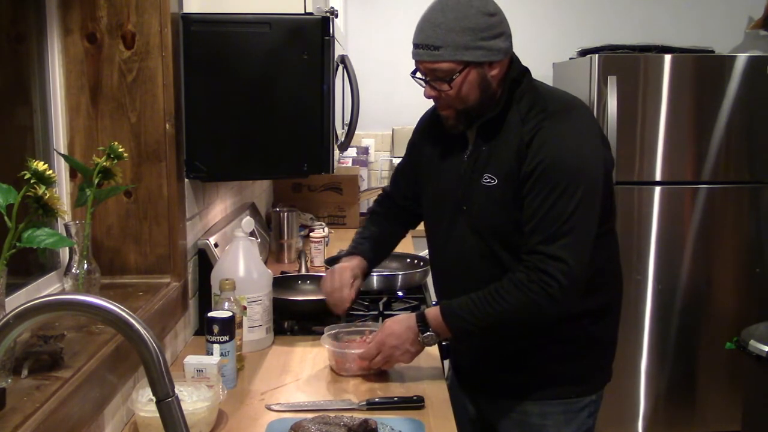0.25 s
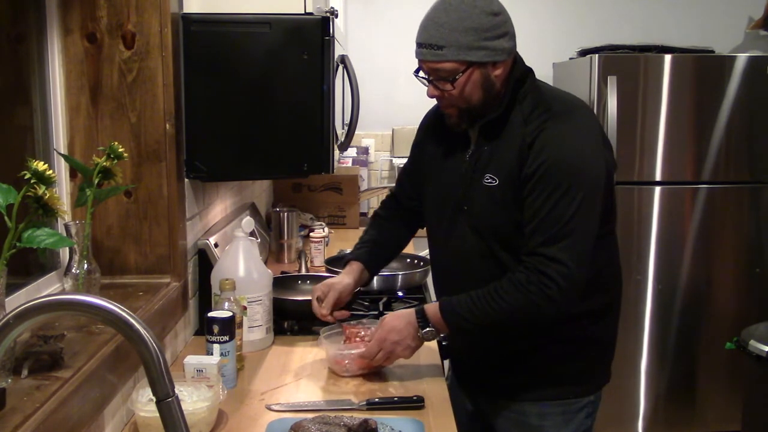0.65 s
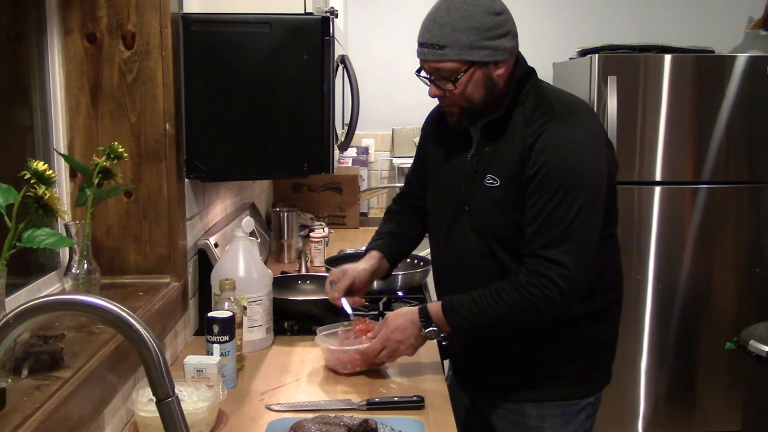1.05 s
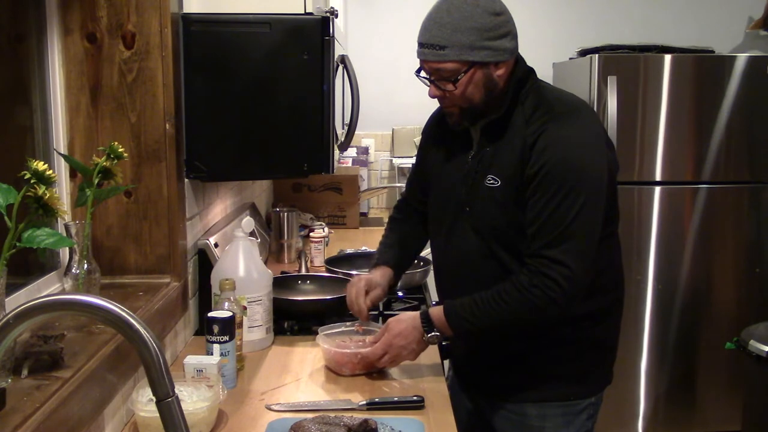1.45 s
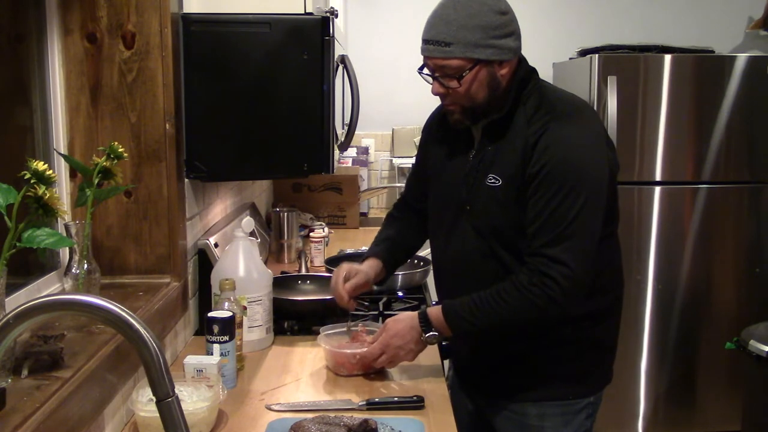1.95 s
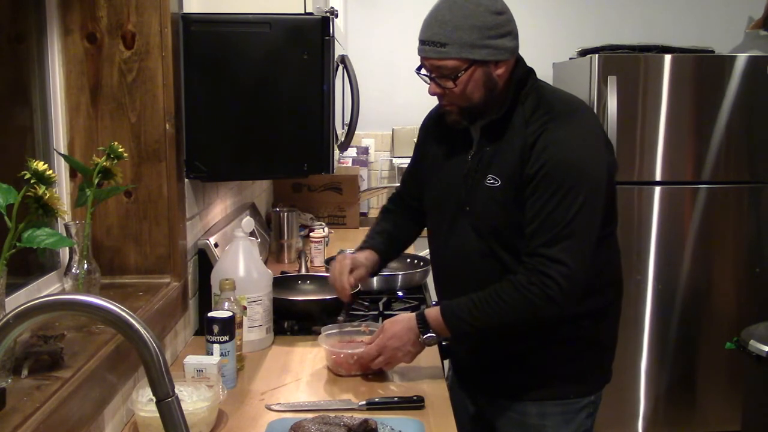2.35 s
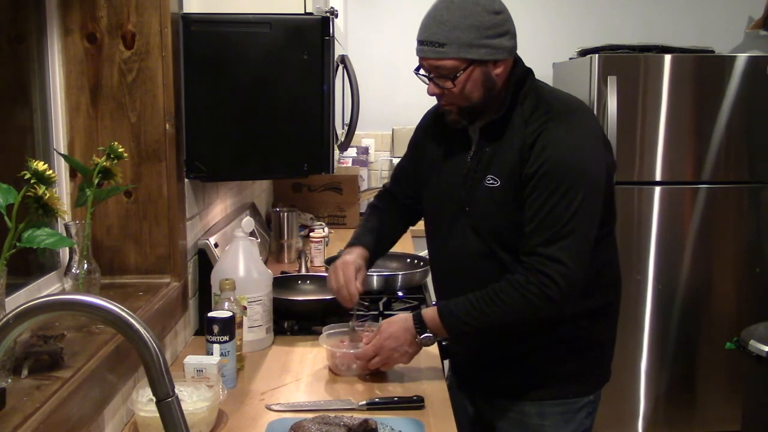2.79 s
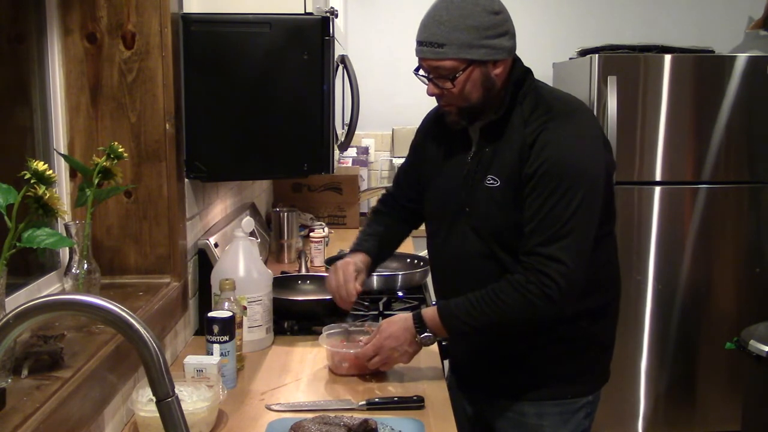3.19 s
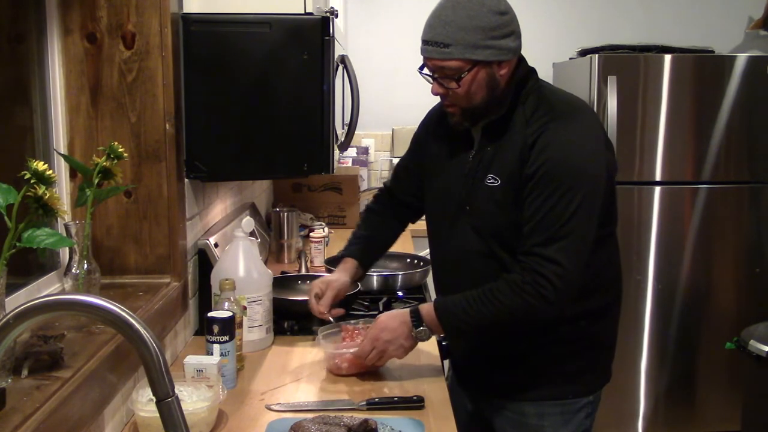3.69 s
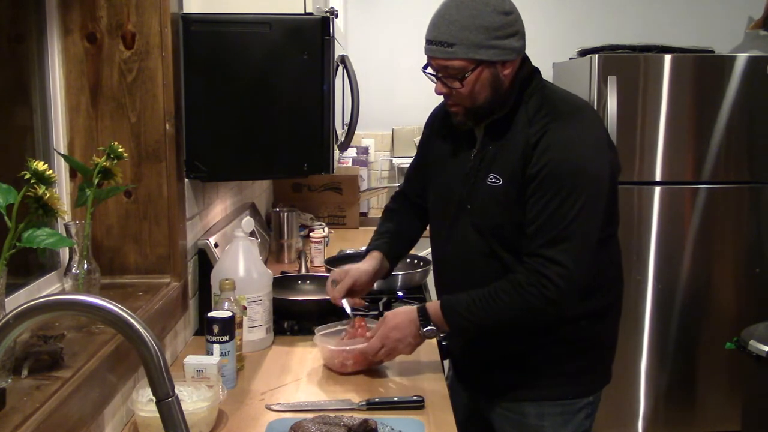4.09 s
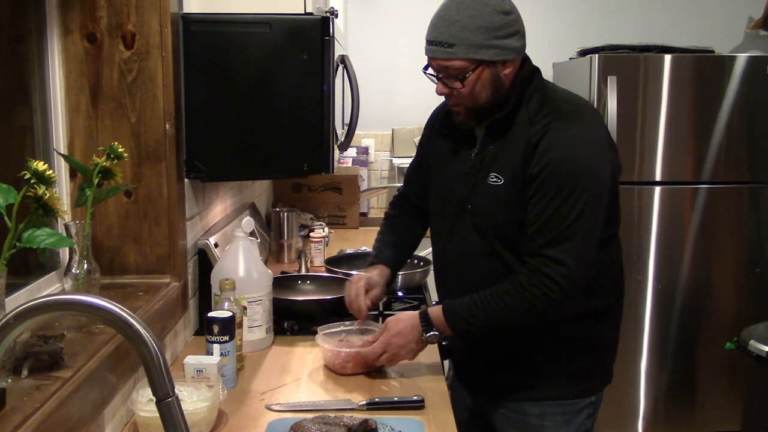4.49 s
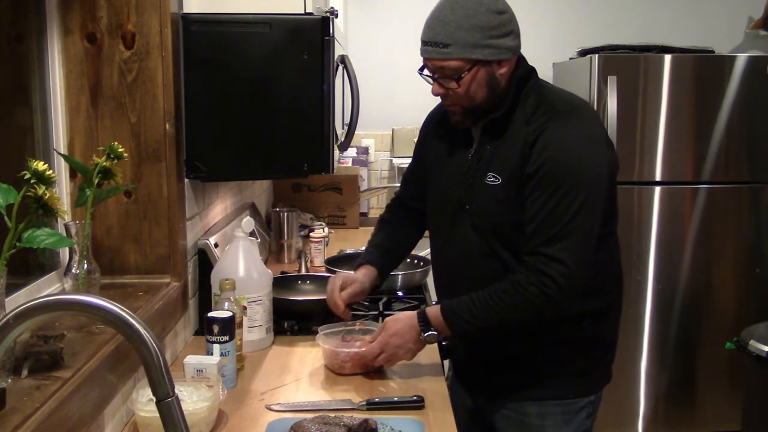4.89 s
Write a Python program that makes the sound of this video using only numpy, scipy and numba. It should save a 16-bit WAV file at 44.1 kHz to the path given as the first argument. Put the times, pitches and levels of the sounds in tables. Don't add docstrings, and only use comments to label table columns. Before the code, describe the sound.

Someone stirs chopped vegetables in a plastic tub: uneven hollow clacks, brief gritty scrapes and tiny wet squeaks, with a refrigerator humming behind.

```python
import sys
import numpy as np
from scipy import signal
from scipy.fft import rfft, irfft, next_fast_len
from scipy.io import wavfile
from scipy.ndimage import uniform_filter1d
from numba import njit

SR = 44100
rng = np.random.default_rng(int(sys.argv[2]) if len(sys.argv) > 2 else 0)


def makeup_ratio(level_db):
    decades = np.asarray(level_db, float) / 20
    return 10 ** decades


def persist_wave(psi):
    counts = np.round(np.clip(psi, -1, 1) * 32767).astype(np.int16)
    wavfile.write(sys.argv[1], SR, np.atleast_2d(counts).T)


N = 226892
T = np.arange(N) / SR

# f/Hz (knock and clack: ratio to their pitch), contact level to spectrum/dB
CONTACT_PARTS = [
    (790, 34.5),
    (270, 43),
    (0.994, 35.5),
    (1.003, 30.5),
    (7500, 29.5),
]
# f/Hz, level under the nearest part/dB
PULSE_ENDS = [(110, -19.5), (16500, -21.5)]
# f/Hz, width/Hz, level above the pulse/dB (below 0: a dip)
TUB_MODES = [(243.4, 37, 4.5), (269, 28, 1.5), (406, 107, 5.5), (516, 45, -13), (570, 72, 3), (684, 116, 8),
             (766, 65, 7.5), (1003, 107, 7.5), (1115, 210, 1), (1295, 70, 5), (1397, 230, 3),
             (1740, 130, 4),
             (2110, 190, 5.2), (2600, 150, 3.9), (3176, 166, 6.4), (3700, 87, 6.9), (4160, 210, 0.97),
               (5100, 60, 2.5), (5780, 340, 6), (7000, 510, 0.65), (8700, 1200, 4.9)]


def knocks(spot_db=1.68, detune=0.049, chatter=1.0, chatter_s=0.0029, even=0.88, damping=1.3):
    size = 4096
    out, t = np.zeros(N + size), T[:size]
    f = np.maximum(np.fft.rfftfreq(size, 1 / SR), 1)
    part_hz, part_db = np.transpose(CONTACT_PARTS)
    mode_hz, width, mode_db = np.transpose(TUB_MODES)[:, :, None]
    (low_hz, low_db), (high_hz, high_db) = PULSE_ENDS
    for s, pitch, blow_db in contacts():
        push = sorted(zip(part_hz * pitch, part_db + blow_db))
        bottom_db, top_db = push[0][1], push[-1][1]
        push = [(1, bottom_db - 80), (low_hz, bottom_db + low_db), *push, (high_hz, top_db + high_db)]
        spot, shift = rng.standard_normal((2, len(mode_hz), 1))
        off_peak = 2 * (f - mode_hz * (1 + detune * shift)) / (damping * width)
        ringing = (mode_db + spot_db * spot) / (1 + off_peak ** 2)
        burst = rng.standard_normal(size) * np.exp(-t / chatter_s)
        rattle = 1 + chatter * rfft(burst) * f / (f + 6000)
        evening = even * 20 * np.log10(np.abs(rattle) + 0.12)
        pulse = causal(on_log(push, f) + ringing.sum(axis=0) - evening)
        fade = np.clip(2 - 2.5 * t / t[-1], 0, 1)
        i = int(s * SR)
        out[i:i + size] += irfft(rfft(pulse) * rattle) * fade
    return out[:N]


# t/s, strength/dB, weight/dB, edge/dB, sharpness/dB
BLOWS = [(.263, -28, -4, -15.5, -1), (.315, -22, 5, -7, -1), (.526, -38, -10, -15.5, 8),
         (.603, -38, -13, -13, 5), (1.682, -30.5, 2, -2, -1.5), (1.721, -22, -6.5, -9, -.5),
         (2.514, -49.5, 9, 6.5, -1), (2.552, -27, 3.5, -10, 4.5), (3.034, -28, -15, -9, -1.5),
         (3.342, -18.5, 3, -6, -3.5), (3.5, -60.5, 14, 9.5, 8), (4.385, -47.5, 0.5, -8, 3),
         (4.773, -16, 2, -7.5, 0.3), (5.121, -57.5, 11, -5, 7)]
# t/s, strength/dB, weight/dB, edge/dB, sharpness/dB
CLACKS = [(.414, -30.5, 3.5, -6.5, -4), (.721, -39, -9, -13, -2), (1.793, -35.5, -4.5, -11, 7),
          (2.139, -51, -1.5, 2, -9), (2.192, -27.5, -11, -1.5, 1.5), (2.442, -36.5, 2, -11.5, 4),
          (2.643, -34, -8, -0.5, 2), (2.98, -44.5, -14, -6, 5), (3.271, -28.5, 2, -5.5, 1.5),
          (3.546, -38, -1, 0.5, -0.5), (3.784, -43, -9, -17, 2.5), (4.445, -18.5, -8, -0.5, -4.5),
          (4.825, -33, -3, 3, -3)]
# t/s, strength/dB, weight/dB, edge/dB, sharpness/dB
NUDGES = [(.874, -48, -0.5, -3, -7), (.971, -42, -12, -22, 6), (1.001, -45.5, -15, -11, -8),
          (1.152, -48, -3, -11, -1.5), (1.233, -45, -14, -18, -6), (1.262, -47, -4, -31, 6),
          (1.288, -39.5, -21, -20, -10), (1.317, -61, 12.5, -10, -3), (1.517, -51, -4, -9, -6),
          (2.039, -56.5, 3, -10, -.5), (2.382, -57.5, 8, -9, 7), (3.937, -28.5, -23, -38, 13),
          (4.669, -28.5, -14, -35, 2.5), (4.711, -42, -15.5, -18, -7), (5.084, -36, -8, -42, 9),
          (5.134, -33, -7, -20.5, 3)]


def contacts():
    kinds = [(BLOWS, 8.25, 4, 1280, 2630), (CLACKS, 10, 12, 1500, 3000), (NUDGES, 12.5, 11, 1180, 2840)]
    found = []
    for table, hollow, dull, knock_hz, clack_hz in kinds:
        pitch = (1, 1, knock_hz, clack_hz, 1)
        for s, db, weight, edge, sharp in table:
            body_db, clack_db = db + weight, db + edge
            levels = (body_db + hollow / 2, body_db - hollow / 2, db, clack_db, clack_db - dull + sharp)
            found.append((s, pitch, levels))
    return sorted(found)


def causal(db):
    cepstrum = irfft(db * np.log(10) / 20)
    half = len(cepstrum) // 2
    cepstrum[1:half] *= 2
    cepstrum[half + 1:] = 0
    return irfft(np.exp(rfft(cepstrum)))


def scrapes(rate=4500, scatter_db=4.0, spread=0.45, rub_rate=1200, rub_ratio=0.281, hiss_db=-7.0, rub_db=-9.0):
    gain, rub, centre = strokes()

    count = int(rate * N / SR)
    start, (detune, ring) = rng.integers(0, N, count), rng.standard_normal((2, count))
    wandering = centre * np.exp(0.17 * walk(45))
    hz = np.clip(wandering[start] * np.exp(spread * detune), 3200, 14500)
    size = makeup_ratio(scatter_db * np.minimum(rng.exponential(size=count), 5))
    slips = grains(start, hz, size, 1.24 * np.exp(0.77 * ring), N)

    count = int(rub_rate * N / SR)
    start, (detune, ring) = rng.integers(0, N, count), rng.standard_normal((2, count))
    hz = rub_ratio * centre[start] * np.exp(0.353 * detune)
    size = makeup_ratio(scatter_db * np.minimum(rng.exponential(size=count), 4))
    rubs = grains(start, hz, size, 3.2 * np.exp(0.263 * ring), N)

    patchy = makeup_ratio(3.6 * walk(120))
    return patchy * (gain * level(slips, hiss_db) + rub * level(rubs, rub_db))


# t/s, length/s, hiss level/dB, hiss centre f/Hz, wall rub above hiss/dB
DRAGS = [(0, .09, -60, 5250, 7), (.54, .04, -41, 5000, -11), (.572, 0.091, -49, 6300, 2.5),
         (.665, .07, -51, 6140, 3), (.77, 0.16, -60.5, 5340, 8), (1.1, .26, -81, 5500, 22),
         (1.4, 0.057, -54, 5100, 2.5), (2.8, 0.037, -66, 5900, 5), (2.91, 0.19, -59, 5500, -2),
         (3.495, 0.035, -49, 5350, -5), (3.54, 0.066, -47, 7500, 9), (3.59, 0.08, -44, 6230, -5),
         (3.65, 0.09, -42, 5300, -2), (3.718, 0.069, -47, 6460, -0.5), (3.8, 0.057, -61, 4900, 8)]
# t/s, length/s, hiss level/dB, hiss centre f/Hz, wall rub above hiss/dB
RUN_UPS = [
    (2.09, .1, -60.5, 7700, 17),
    (4.36, .083, -54, 5840, 3.7),
    (5.03, 0.037, -66, 5400, 8.5),
    (5.11, .04, -68, 5700, 6.4),
]


def strokes(attack_s=0.0091, release_s=0.015, drag_fade_db=-9.5, run_up_db=12):
    gain, rub, centre = np.zeros(N), np.zeros(N), np.full(N, 6000.)
    for table, end_db in ((DRAGS, (0, drag_fade_db)), (RUN_UPS, (-run_up_db, 0))):
        for s, length, db, hz, rub_db in table:
            end = s + length
            i = slice(int(max(s, 0) * SR), int(end * SR))
            edge = np.clip(np.minimum((T[i] - s) / attack_s, (end - T[i]) / release_s), 0, 1)
            shape = edge * makeup_ratio(db + np.interp(T[i], (s, end), end_db))
            gain[i] += shape
            rub[i] += makeup_ratio(rub_db) * shape
            centre[i] = hz
    return gain, rub, centre


@njit
def grains(start, hz, size, cycles, count):
    y = np.zeros(count)
    for g in range(len(start)):
        p = np.exp((2j * np.pi - 1 / cycles[g]) * hz[g] / SR)
        z = size[g] + 0j
        for i in range(start[g], min(count, start[g] + int(5 * cycles[g] * SR / hz[g]))):
            y[i] += z.imag
            z *= p
    return y


# t/s, f/Hz, level/dB, length/s
SQUEAKS = [(.54, 10050, -50, .015), (.542, 5270, -42, 0.011), (.548, 3400, -54.5, 0.0104),
           (.575, 5360, -60, 0.01), (0.603, 8560, -55, .015), (0.666, 4640, -55, 0.024),
           (.678, 8580, -52.5, 0.026), (0.681, 9800, -60, .02), (.716, 9460, -59, .015),
           (.76, 10200, -61, 0.0086), (2.827, 9500, -62, 0.0113), (3.634, 6830, -48, 0.0144),
           (3.668, 7500, -47, 0.012), (3.692, 3700, -48, .012), (3.725, 7150, -49.5, 0.019),
           (3.869, 7900, -61.5, 0.011), (4.12, 7000, -64, .012)]


def squeaks(waver=0.045):
    out, drift, rough = np.zeros(N), 1 + waver * walk(400), makeup_ratio(3.5 * walk(500))
    for s, hz, db, length in SQUEAKS:
        i = slice(int(s * SR), int((s + length) * SR))
        shape = np.sin(np.pi * np.clip((T[i] - s) / length, 0, 1) ** 0.36)
        whistle = np.sin(2 * np.pi * np.cumsum(hz * drift[i]) / SR)
        out[i] += makeup_ratio(db - 2.5) * shape * rough[i] * whistle
    return out


# f/Hz, t60/s, echo level/dB, build-up/s, side level/dB
ROOM = [(71.4, 0.24, -24, 0.016, -8), (226, 0.32, -17, 0.0076, -70), (715, 0.34, -31.5, 0.0098, -38),
        (1730, 0.41, -28, 0.0016, -20), (5000, 0.3, -28.5, 0.0029, -17), (11900, 0.19, -31, 0.0043, -15)]
# t/s, level/dB, left minus right/dB
EARLY = [(.0024, -3, .8), (.0043, -7, .4), (.0058, -2.5, -.3), (.0078, -2.5, -.4), (.017, -14, .3),
         (.027, -15, -1.5)]


def kitchen(thin_hz=330, soft_hz=9000):
    t = np.arange(int(.6 * SR)) / SR
    mid, side = 0, 0
    for hz in 50 * 2 ** np.arange(0, 8.6, .5):
        t60, db, rise, side_db = (on_log(ROOM, hz, column=k) for k in range(1, 5))
        noise = band(rng.standard_normal((2, len(t))), hz, hz * .45)
        tail = makeup_ratio(db) * noise * (1 - np.exp(-t / rise)) * np.exp(-np.log(1000) * t / t60)
        mid, side = mid + tail[0], side + makeup_ratio(side_db) * tail[1]
    near = np.zeros((2, len(t)))
    for s, db, pan_db in EARLY:
        near[:, int(s * SR)] += makeup_ratio(db + np.array([pan_db, -pan_db]) / 2)
    near = signal.sosfilt(signal.butter(1, soft_hz, fs=SR, output="sos"), near)
    near[:, 0] = 1
    near = signal.sosfilt(signal.butter(2, thin_hz, "highpass", fs=SR, output="sos"), near)
    return near + np.array([mid + side, mid - side])


# t/s, rumble level/dB, hold/s
JOLTS = [
    (.32, -58, .03),
    (1.39, -60, .02),
    (1.69, -50.5, 0.31),
    (2.185, -50, 0.018),
    (2.54, -53, .03),
    (3.03, -54, .02),
    (3.34, -55, .03),
    (4.445, -49, .03),
    (4.775, -55, .02),
]


def worktop_rumble(floor_db=-73.5, rise_db_s=400, fall_db_s=230):
    gain = makeup_ratio(floor_db)
    for s, db, hold in JOLTS:
        before, after = np.maximum(s - T, 0), np.maximum(T - s - hold, 0)
        gain = gain + makeup_ratio(db - rise_db_s * before - fall_db_s * after)
    return gain * level(band(long_noise(), 65.0, 55.4)[:N], -5)


# f/Hz, width/Hz, rms level/dB
HUM = [(213.4, 5.5, -72), (248.6, 13, -60), (595.4, 8, -68), (10980, 180, -86.5)]
# t/s, level/dB
MOTOR = [(0, -62), (.41, -66), (.67, -57.5), (1.22, -55), (1.4, -72), (1.7, -59.5), (2.13, -58),
         (2.36, -67), (3.2, -64.5), (3.6, -65), (5.14, -63.5)]


def fridge_tones(motor_hz=121, whine_hz=359.7, whine_db=-55):
    hums = sum(level(band(long_noise(), hz, width)[:N], db) for hz, width, db in HUM)
    whine_phase = 2 * np.pi * np.cumsum(whine_hz * (1 + 0.00306 * walk(4.15))) / SR
    whine = makeup_ratio(whine_db + 3 + 0.72 * walk(16.0)) * np.sin(whine_phase)
    s, motor_db = np.transpose(MOTOR)
    motor_phase = 2 * np.pi * np.cumsum(motor_hz * (1 + 0.0105 * walk(2.9))) / SR
    motor = makeup_ratio(np.interp(T, s, motor_db) - 4.5) * np.sqrt(2) * np.sin(motor_phase)
    return hums + whine + motor


# f/Hz, level per Hz/dB
AIR = [(15, -66), (25, -39), (108, -16.5), (170, -22), (249, -2), (326, -11.5), (363, 2), (394, -5),
       (607, -14.5), (936, -9.5), (1020, -14), (1330, -19.5), (2690, -25), (9840, -40.5), (16000, -47.5)]
# f/Hz, side level/dB
AIR_SIDE = [(30, -1.5), (150, -14), (300, -19), (1000, -16.5), (4000, -11.5), (14000, -12.5)]


def fridge_air(air_db=-50, swell_db=1.5, flicker_db=-0.5):
    air, swell = 0, walk(0.67)
    noise = long_noise(2)
    for hz in 25 * 2 ** np.arange(0, 9.5, 1 / 3):
        mid, side = band(noise, hz, hz * .3)[:, :N]
        gain = makeup_ratio(on_log(AIR, hz) + swell_db * swell + flicker_db * walk(19))
        air = air + gain * (mid + makeup_ratio(on_log(AIR_SIDE, hz)) * side * np.array([[1], [-1]]))
    return level(air, air_db)


def level(x, db):
    return x * makeup_ratio(db) / np.sqrt(np.mean(x ** 2))


def on_log(table, hz, column=1):
    table = np.array(table)
    return np.interp(np.log(hz), np.log(table[:, 0]), table[:, column])


def long_noise(*channels):
    return rng.standard_normal((*channels, next_fast_len(N)))


def band(x, hz, width):
    f = np.fft.rfftfreq(x.shape[-1], 1 / SR)
    bell = np.exp(-.5 * ((f - hz) / width * 2) ** 2)
    return irfft(rfft(x) * bell, x.shape[-1])


def walk(rate):
    k = int(SR / rate)
    steps = np.repeat(rng.standard_normal(N // k + 1), k)
    return 1.183 * uniform_filter1d(uniform_filter1d(steps, k), k)[:N]


def scene(pan_db=0.6):
    tub = knocks() * makeup_ratio(-8) + scrapes() + squeaks()
    heard = signal.fftconvolve(tub[None], kitchen(), axes=1)[:, :N]
    heard = heard * makeup_ratio(np.array([[pan_db], [-pan_db]]) / 2)
    return heard + worktop_rumble() + fridge_tones() + fridge_air()


def roll_off(x):
    return signal.sosfilt(signal.butter(12, 16510, fs=SR, output="sos"), x)


def record(dry):
    x = signal.sosfilt(signal.butter(2, 45, "highpass", fs=SR, output="sos"), dry)
    x = signal.sosfilt(signal.ellip(8, .2, 60, 16000, fs=SR, output="sos"), x)
    return roll_off(x)


dry = scene()
out = record(dry)
persist_wave(out)
```